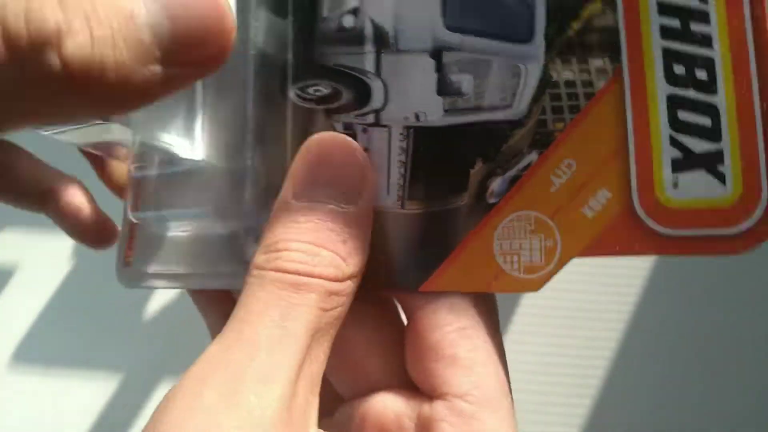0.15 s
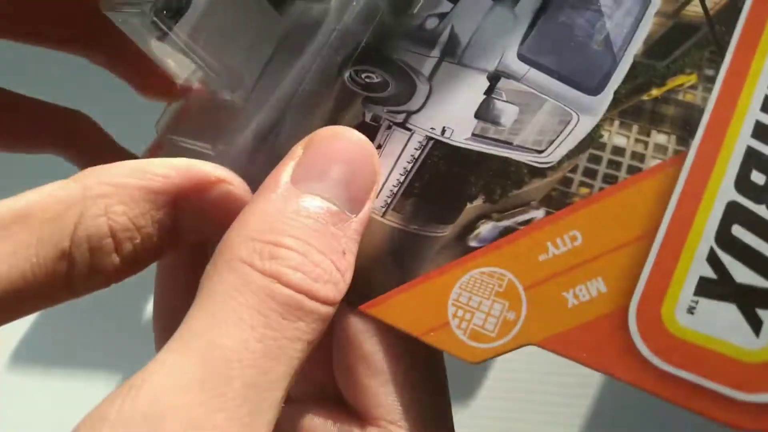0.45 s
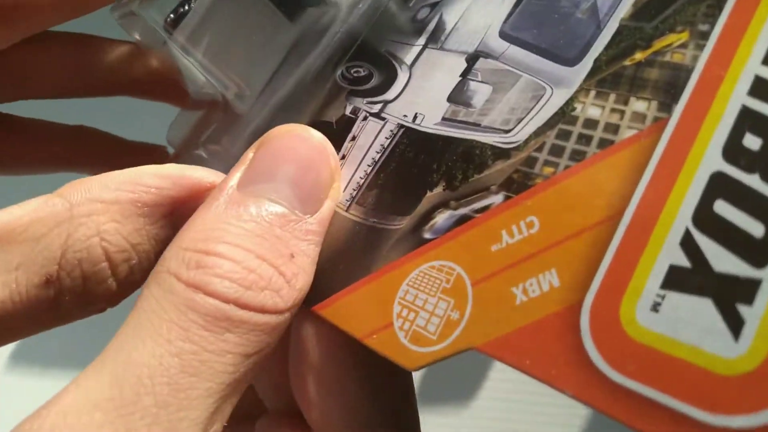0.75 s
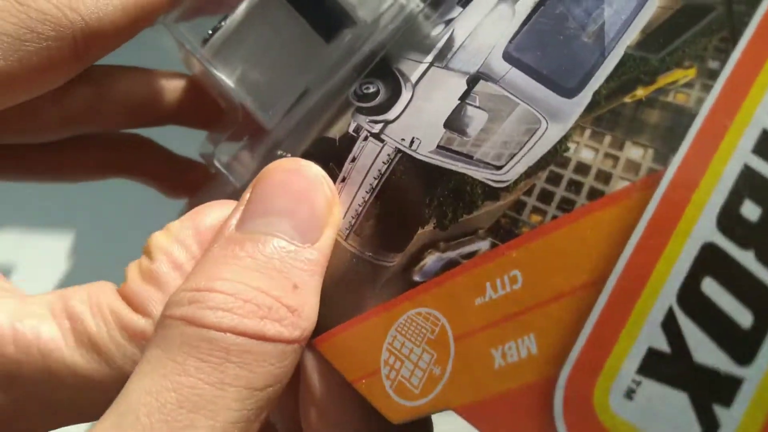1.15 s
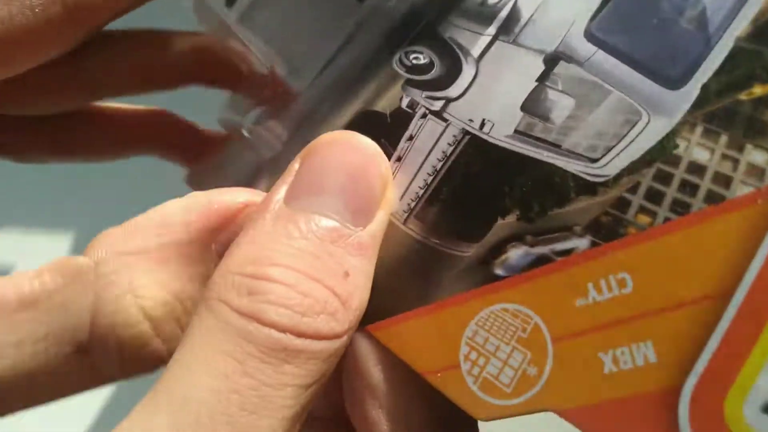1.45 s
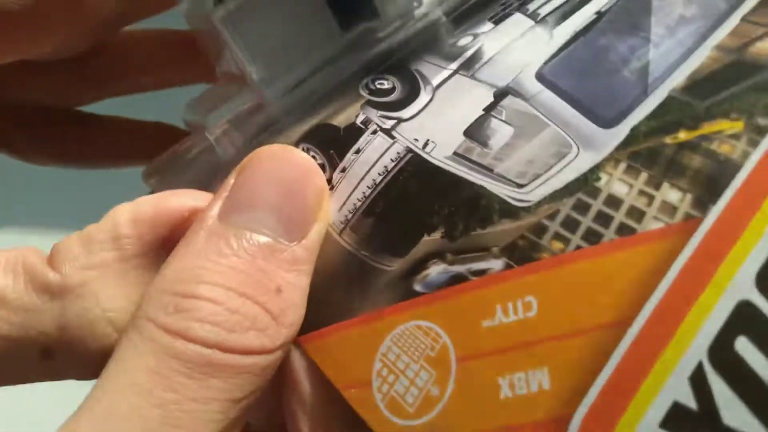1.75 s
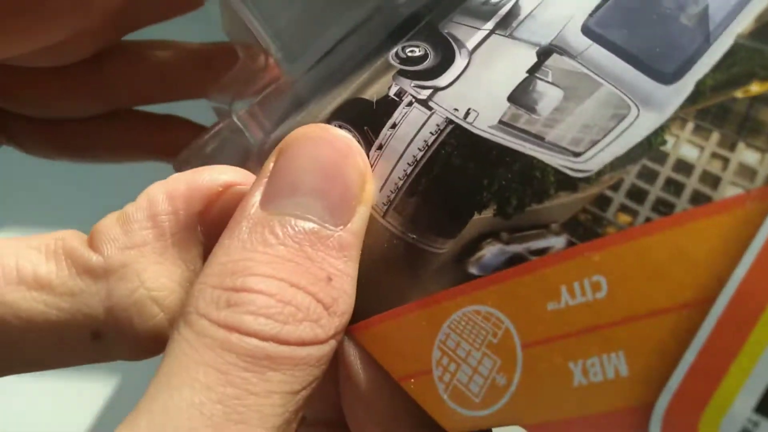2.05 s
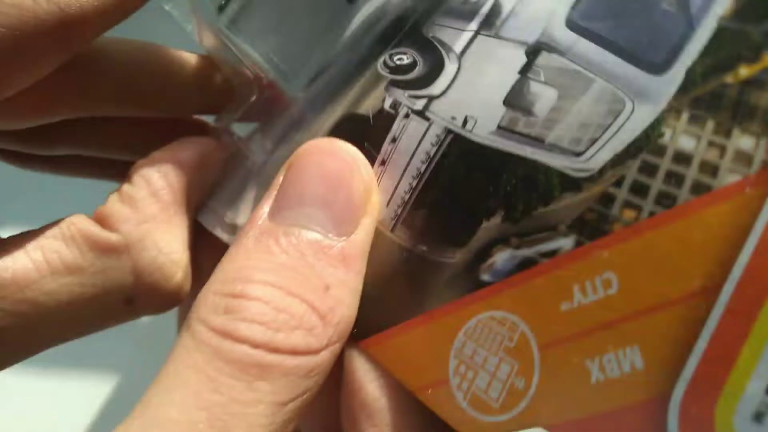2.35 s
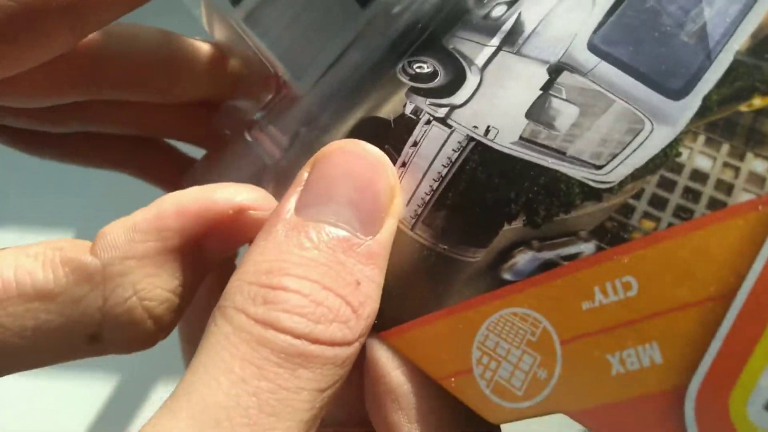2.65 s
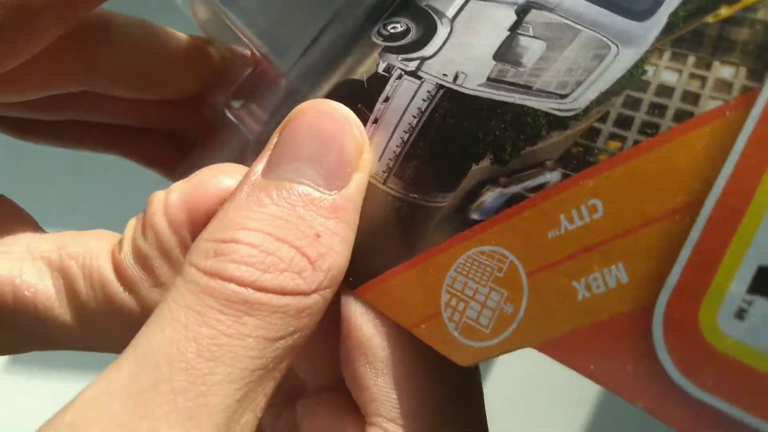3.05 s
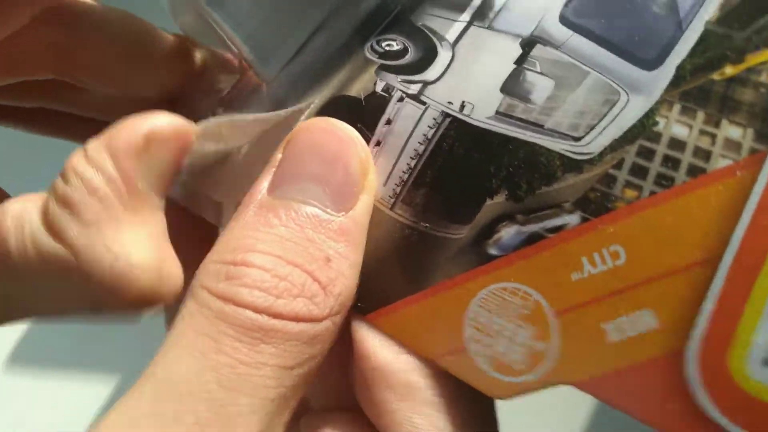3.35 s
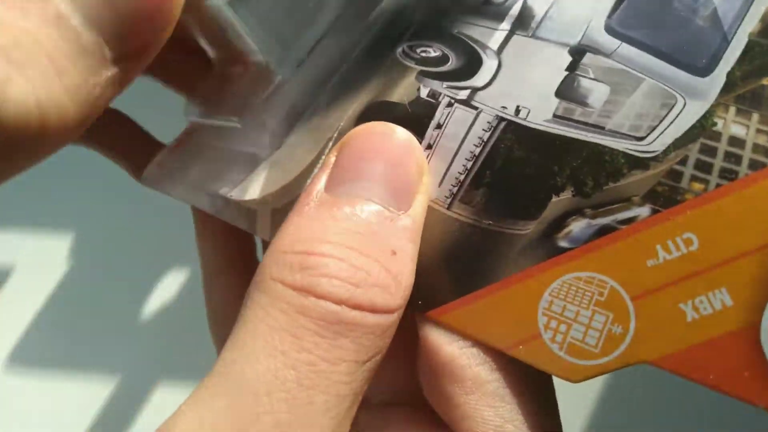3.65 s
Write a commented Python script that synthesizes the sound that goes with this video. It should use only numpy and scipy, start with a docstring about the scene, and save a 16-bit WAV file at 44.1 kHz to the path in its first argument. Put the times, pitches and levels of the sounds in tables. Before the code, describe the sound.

Stiff thin plastic clicks, scrapes and snaps, then ticks quicken into one loud final snap.

```python
"""Plastic clicks, scrapes and snaps; later thin ticks come faster and faster, up to a second, bigger snap.
Fingers pry a thin plastic blister off its cardboard backing, close to the microphone in a small room.
Clicks, snaps and ticks are short bursts of noise; scraping, sliding and crackle are rains of tiny cracks.
Low shoves make the card thud, the hands rumble, and faint whines lie over quiet room noise.
The shell's resonances and the echoes of the room are added to the plastic sounds."""
import sys
import numpy as np
from scipy import signal
from scipy.fft import rfft, irfft
from scipy.io import wavfile
from scipy.ndimage import uniform_filter1d

SR = 44100
rng = np.random.default_rng(int(sys.argv[2]) if len(sys.argv) > 2 else 0)


def dump_mix(stems):
    """Bounce the given channels to the path in sys.argv[1] as a 16-bit WAV at rate SR."""
    frames = np.atleast_2d(stems).T  # one column per channel
    limited = np.clip(frames, -1, 1)  # hard clip at full scale
    pcm = np.round(limited * 32767).astype(np.int16)
    wavfile.write(sys.argv[1], SR, pcm)


N = 167580
T = np.arange(N) / SR

# The shell buckles: (time [s], crack level [dB], shell knock level [dB],
# pitch of the buckling patch [Hz], thud level [dB])
BUCKLES = [(.207, -38, -40.5, 1590, -53), (0.2298, -34.5, -45.5, 1170, -53), (.265, -41, -46, 820, -71),
           (0.318, -25.5, -27.5, 3480, -36.5), (0.3774, -34.5, -51, 830, -56),
           (.389, -30, -39.5, 1050, -40), (0.4301, -36, -59, 660, -55), (0.4577, -23, -28.5, 1400, -39.5),
           (0.473, -32, -33, 960, -35.5), (0.4923, -26.5, -63, 1250, -46), (0.5116, -53, -38, 1180, -49),
           (0.5406, -40.5, -36.5, 4900, -52), (0.5744, -29.5, -27.5, 1710, -50), (.607, -40, -37, 890, -49),
           (0.8735, -30, -52, 5730, -75), (.882, -24, -41, 6010, -53), (1.3475, -28, -36, 1250, -53),
           (1.35, -20.5, -34, 1600, -64), (1.4196, -27, -49, 830, -65), (1.453, -32, -40, 5930, -57),
           (1.5113, -33, -33.5, 4300, -43), (1.557, -28, -40, 1120, -49), (1.6362, -39.5, -53, 483, -51.5),
           (1.803, -69, -51, 600, -52.5), (1.8821, -27.5, -48, 1440, -80), (1.929, -28, -25, 5500, -34),
           (2.0928, -45.5, -40, 1340, -80), (2.1195, -20.5, -38.5, 6950, -73),
           (2.2865, -19, -22, 1170, -38), (2.3092, -26, -34, 1550, -46), (2.3301, -30, -33.5, 750, -40),
           (2.343, -19.5, -38.5, 1500, -42.5), (2.3491, -14, -26.5, 1630, -29),
           (2.3534, -29, -20.5, 2700, -42), (2.3654, -16.5, -17.5, 2620, -40),
           (2.3765, -16, -21.5, 1400, -29.5), (2.3824, -35, -21, 800, -33.5), (2.4229, -33, -34, 540, -49),
           (2.4648, -23.5, -21.5, 2450, -34), (2.618, -22, -29, 1246, -39.5),
           (2.997, -46, -51.5, 664, -54.5), (3.004, -55, -58, 721, -54.5)]
# The blister jumps free of the card: (time [s], crack level [dB], thud level [dB], decay [ms])
JUMPS = [(1.2876, -18, -40, 5.2), (1.293, -2, -35, 1.9), (1.2953, -3, -26, 2.6),
         (1.3099, -13.5, -30.5, 0.38), (3.4644, -10, -60.5, 2.4), (3.4706, 3, -40, 4.9),
         (3.479, 3.5, -46, 4.2), (3.483, 4, -46, 7.3)]
# Spectrum of a bright crack: (frequency [Hz], level [dB])
CRACK_COLOUR = [(300, -38.5), (2000, -17.5), (4000, -17.5), (6500, -11), (8500, -5), (10000, -1),
                (11500, -6.5), (13500, -5.5), (16000, -15)]
# Spectrum of the hollow shell: (frequency [Hz], level [dB])
BODY_COLOUR = [(60, -26), (200, -17), (380, -4.5), (560, 3.5), (800, -8.5), (1500, -1.5), (2200, -7),
               (3200, -9.5), (6000, -4.5), (9000, -14), (16000, -12)]
# Spectrum of a jerk of the card: (frequency [Hz], level [dB])
THUD_COLOUR = [(15, -36), (40, -9), (75, 3), (150, -1), (260, -10), (430, -19), (900, -35), (3000, -60)]


def amp(db):
    """Turns decibels into a gain."""
    return 10 ** (np.asarray(db) / 20)


def unit(x):
    """Scales a signal to an rms (average strength) of 1."""
    return x / np.sqrt(np.mean(x ** 2) + 1e-20)


def read(points, hz):
    """Reads a table between its points, with frequency on a logarithmic scale."""
    f, value = np.transpose(points)
    return np.interp(np.log(hz + 1), np.log(f + 1), value)


def level(points):
    """Turns a curve in dB into a gain over time."""
    return amp(np.interp(T, *np.transpose(points)))


def add(mix, s, sound):
    """Adds a sound to the mix at time s."""
    part = mix[:, round(s * SR):][:, :sound.shape[1]]
    part += sound[:, :part.shape[1]]


def resonate(x, hz, width_hz):
    """Lets a narrow resonance ring: the narrower it is, the longer it rings."""
    return signal.lfilter(*signal.iirpeak(hz, hz / width_hz, SR), x)


def colour(x, points, size=4096):
    """Gives a sound the spectrum of a table, without pre-echo; white noise keeps its energy."""
    hz = abs(np.fft.fftfreq(size, 1 / SR))
    gain = unit(amp(read(points, hz)))
    # The minimum-phase filter puts its energy as early as it can
    spectrum = np.exp(np.conj(signal.hilbert(np.log(gain))))
    taps = np.fft.ifft(spectrum).real
    return signal.oaconvolve(x, taps[None], axes=1)[:, :N]


def ports(size):
    """Noise for the left and right microphone ports that is partly the same at both."""
    likeness = 0.4  # 0 = unrelated, 1 = identical
    a, b = rng.standard_normal((2, size))
    return np.array([likeness * a + np.sqrt(1 - likeness ** 2) * b, a])


def flexed(x, count=6):
    """The bent plastic has different resonances at every crack."""
    lowest_hz, highest_hz, width_hz, gain_db = 1000, 4000, 130, -2
    modes = np.exp(rng.uniform(np.log(lowest_hz), np.log(highest_hz), count))
    return x + amp(gain_db) * sum(resonate(x, hz, width_hz) for hz in modes)


def bursts(rows, rough=0.69, size=3000):
    """Each row (s, dB as if packed in 1 ms, decay ms) is a sudden, quickly dying run of tiny slips."""
    out = np.zeros((2, N))
    ms = np.arange(size) * 1000 / SR
    for s, db, decay_ms in rows:
        unevenness = unit(uniform_filter1d(rng.standard_normal(size), 20))
        slips = np.exp(rough * unevenness)
        burst = flexed(ports(size) * slips * np.exp(-ms / decay_ms))
        add(out, s, amp(db) * unit(burst) / np.sqrt(ms[-1]))
    return out


def grains(per_s, spread_db, decay_s):
    """A steady rain of tiny, quickly dying cracks of uneven size."""
    starts = rng.random(N) < per_s / SR
    sizes = amp(spread_db * np.minimum(rng.exponential(1, N), 3)) * starts
    envelope = signal.lfilter([1], [1, -np.exp(-1 / (decay_s * SR))], sizes)
    return unit(envelope * ports(N))


def push(s, db):
    """One shove of air; it reaches the left port later and in the opposite sense."""
    lag_s = .001
    out = np.zeros((2, N))
    size = amp(db) * np.sqrt(SR / 1000)  # one sample with the energy of 1 ms
    out[1, round(s * SR)] = size
    out[0, round((s + lag_s) * SR)] = -size
    return out


def whine(curve, hz):
    """A thin, unsteady tone: noise passed twice through a narrow resonance."""
    width_hz = 130
    tone = resonate(resonate(ports(N), hz, width_hz), hz, width_hz)
    return level(curve) * unit(tone)


def background():
    """Quiet room noise is coloured noise; two faint whines come and go over it."""
    # Spectrum of the room noise: (frequency [Hz], level [dB])
    noise_colour = [(20, -11.5), (200, -15), (350, -1), (600, -13), (1100, -19.5), (2500, -18.5),
                    (10000, -18), (16000, -37.5)]
    # A faint narrow whine: (time [s], level [dB])
    low_whine = [(.08, -90), (.18, -73), (.35, -105), (1.77, -100), (1.81, -68.5), (2.2, -70.5),
                 (2.7, -97.5), (2.9, -78), (3.0, -99)]
    # A higher whine joins it briefly: (time [s], level [dB])
    high_whine = [(2.78, -105), (2.89, -82), (2.98, -102)]
    noise_db = -78
    noise = amp(noise_db) * colour(rng.standard_normal((2, N)), noise_colour)
    return noise + whine(low_whine, hz=1550) + whine(high_whine, hz=4070)


def rubbing():
    """Many tiny cracks make the gritty scraping of plastic on card and the finer hiss of fingertips."""
    # Fingertips slide over the plastic: (time [s], level [dB])
    slide = [(0, -60.5), (.08, -67.5), (.13, -76), (.38, -58), (.72, -67), (.96, -56.5), (1.26, -60.5),
             (1.6, -60), (1.73, -80.5), (1.87, -71), (2.24, -85), (2.6, -54.5), (2.72, -86), (3.1, -103),
             (3.55, -53), (3.8, -57.5)]
    # The shell's edge scrapes on the card: (time [s], level [dB])
    scrape = [(.17, -80), (.32, -60), (.44, -55), (.49, -44), (.61, -72), (.7, -66.5), (1.28, -81),
              (1.32, -34.5), (1.42, -61), (1.6, -61.5), (1.72, -81.5), (2.27, -66.5), (2.3, -41),
              (2.39, -33.5), (2.44, -52.5), (2.7, -90), (3.5, -83.5), (3.6, -57), (3.8, -63.5)]
    # Spectrum of skin on plastic: (frequency [Hz], level [dB])
    skin_colour = [(60, -24), (420, -4), (900, -23), (2500, -28.5), (6000, -14.5), (9200, -4.5),
                   (9950, 3.5), (10700, -2), (11500, -1.5), (13000, -8), (16000, -15)]
    hiss = level(slide) * grains(per_s=4000, spread_db=2.5, decay_s=.0008)
    grit = level(scrape) * grains(per_s=650, spread_db=4.5, decay_s=.0005)
    hollow = amp(-1.5) * colour(grit, BODY_COLOUR)
    bright = amp(-3.5) * colour(grit[::-1], CRACK_COLOUR)  # left and right swapped
    return hollow + bright + colour(hiss, skin_colour)


def grip_rumble():
    """Hands shift their grip: low noise that reaches the left port later and in the opposite sense."""
    # Level of the rumble: (time [s], level [dB])
    grip = [(.2, -80), (.48, -55), (.75, -85), (1.25, -78), (1.33, -55), (1.62, -65), (1.78, -85),
            (2.25, -76), (2.39, -44), (2.44, -57), (2.75, -70), (2.85, -92)]
    band_hz, lag_s = (52, 130), .0022
    band = signal.butter(2, band_hz, "band", fs=SR, output="sos")
    rumble = level(grip) * unit(signal.sosfilt(band, rng.standard_normal(N)))
    return np.array([-np.roll(rumble, round(lag_s * SR)), rumble])


def buckling():
    """Each click has a bright crack, a hollow knock of the shell and a short ring of the patch that flips."""
    decay_ms = 1.4
    ring_db, ring_width = -6, .14  # level relative to the knock; width as a share of the pitch
    ms = np.arange(3000) * 1000 / SR
    rings = np.zeros((2, N))
    for s, _, db, hz, _ in BUCKLES:
        ring = resonate(ports(len(ms)) * np.exp(-ms / decay_ms), hz, hz * ring_width)
        add(rings, s, amp(db + ring_db) * unit(ring) / np.sqrt(ms[-1]))
    cracks = bursts([(s, db, decay_ms) for s, db, *_ in BUCKLES])
    knocks = bursts([(s, db, decay_ms) for s, _, db, *_ in BUCKLES])
    return colour(cracks, CRACK_COLOUR) + amp(-2.0) * colour(knocks, BODY_COLOUR) + rings


def thuds():
    """The card jerks at every click and snap, and booms at its own low resonance."""
    boom_hz, boom_width_hz, boom_db = 118.1, 17, 0.5
    click_pushes = sum(push(s, db) for s, *_, db in BUCKLES)
    snap_pushes = sum(push(s, db) for s, _, db, _ in JUMPS)
    jerks = colour(click_pushes + snap_pushes, THUD_COLOUR)
    return jerks + amp(boom_db) * resonate(jerks, boom_hz, boom_width_hz)


def snapping():
    """The two loud snaps, each a few cracks in quick succession."""
    # Spectrum of a snap: (frequency [Hz], level [dB])
    snap_colour = [(80, -29.5), (300, -16.5), (750, -13.5), (1400, -15), (2200, -17.5), (3300, -10.5),
                   (5500, -4), (7500, -7.5), (10000, 1), (12000, -4.5), (16000, -5)]
    return colour(bursts([(s, db, decay_ms) for s, db, _, decay_ms in JUMPS]), snap_colour)


def peeling():
    """Glue spots let go as thin ticks over a crackle that swells as the seam opens."""
    # Glue spots let go: (time [s], level [dB])
    ticks = [(3.151, -40.5), (3.2297, -30), (3.2448, -30.5), (3.306, -36), (3.3215, -26.5), (3.3538, -32),
             (3.3673, -25), (3.3822, -35), (3.391, -22), (3.4056, -20.5), (3.418, -21), (3.4209, -11),
             (3.4264, -12), (3.4291, -12), (3.4338, -7.5), (3.4358, -20), (3.4497, -13), (3.4537, -23),
             (3.4625, -25)]
    # Crackle of the parting seam: (time [s], level [dB])
    crackle_curve = [(3.1, -71), (3.16, -55.5), (3.23, -43.5), (3.29, -42), (3.35, -41.5), (3.41, -35),
                     (3.43, -15.5), (3.446, -27), (3.468, -10), (3.49, -59)]
    # Spectrum of the seam: (frequency [Hz], level [dB])
    seam_colour = [(100, -47), (2500, -44.5), (4200, -26), (6500, -24), (8300, -12.5), (10000, -2),
                   (11300, -7.5), (13000, -7.5), (16000, -21)]
    tick_decay_ms = 0.76
    left_db, right_db = -3, 1  # the seam lies further to the right
    crackle = level(crackle_curve) * grains(per_s=900, spread_db=3, decay_s=.0004)
    spots = bursts([(s, db, tick_decay_ms) for s, db in ticks])
    return colour(spots + amp(-1.5) * crackle, seam_colour) * amp([[left_db], [right_db]])


def recoil():
    """The card recoils as the seam gives way: one shove without the boom."""
    return colour(push(s=3.4718, db=-9), THUD_COLOUR)


def shell(x):
    """The blister rings briefly at its resonances."""
    # Resonances of the blister shell: (frequency [Hz], width [Hz], gain [dB])
    resonances = [(693, 360, -7.5), (779, 50, -5), (1040, 18, -27), (1180, 80, -12), (1450, 110, -5.5),
                  (3065, 360, -14.5), (8000, 160, -12), (10020, 90, -13)]
    return x + sum(amp(db) * resonate(x, hz, width_hz) for hz, width_hz, db in resonances)


def room(x, size=16384):
    """Close reflections from hands and table, and a short tail whose decay depends on frequency."""
    # Time in which the tail falls by 60 dB: (frequency [Hz], time [s])
    fall_times = [(60, 0.051), (260, 0.04), (700, 0.24), (1840, 0.21), (4850, 0.22), (12800, 0.13)]
    tail_db, near_db, near_decay_s = -4, -5, 0.0044
    t = np.arange(size) / SR
    hz, frames_s, z = signal.stft(rng.standard_normal((2, size)), SR, nperseg=256)
    fading = z * amp(-60 * frames_s / read(fall_times, hz)[:, None])
    tail = signal.istft(fading, SR, nperseg=256)[1][:, :size]
    near = rng.standard_normal((2, size)) * np.exp(-t / near_decay_s)
    # Both parts swell in over about a millisecond
    tail = amp(tail_db) * unit(tail * np.minimum(t / 0.0014, 1))
    near = amp(near_db) * unit(near * np.minimum(t / 0.00099, 1))
    return signal.fftconvolve(x, (tail + near) / np.sqrt(size), axes=1)[:, :N]


def facing(x):
    """The shell radiates unevenly: each band is tipped towards the port that it faces."""
    # Difference between the ports: (frequency [Hz], left minus right [dB])
    left_minus_right = [(500, -1), (1000, 2), (4200, 4.5), (8000, -4), (12500, 2)]
    tilt_db = read(left_minus_right, np.fft.rfftfreq(N, 1 / SR))
    return irfft(rfft(x) * amp(np.array([tilt_db, -tilt_db]) / 2), N)


def scene():
    """The pack is held slightly to the right, so its direct sound reaches the left port later."""
    left_lag = 12  # samples
    left_db, right_db = -2, 2.5
    quiet = background()
    plastic = amp(-2.0) * shell(rubbing() + buckling() + snapping() + peeling())
    low = grip_rumble() + thuds() + recoil()
    left, right = plastic
    direct = np.array([np.pad(left, (left_lag, 0))[:N], right])
    wet = room(plastic + amp(-6) * low)
    return facing(direct + wet) * amp([[left_db], [right_db]]) + low + quiet


def record(dry):
    """The loudest peaks are rounded off; then the low cut and the treble limit."""
    low_cut_hz, treble_limit_hz = 42, 16000
    rounded = dry / (1 + dry ** 6) ** (1 / 6)
    low_cut = signal.butter(2, low_cut_hz, "high", fs=SR, output="sos")
    treble_limit = signal.firwin(301, treble_limit_hz, window=("kaiser", 8), fs=SR)
    return signal.oaconvolve(signal.sosfilt(low_cut, rounded), treble_limit[None], "same")


dry = scene()
out = record(dry)
dump_mix(out)
```